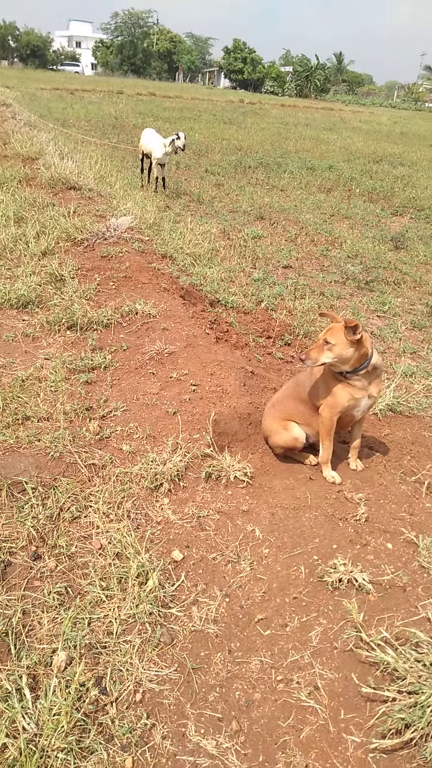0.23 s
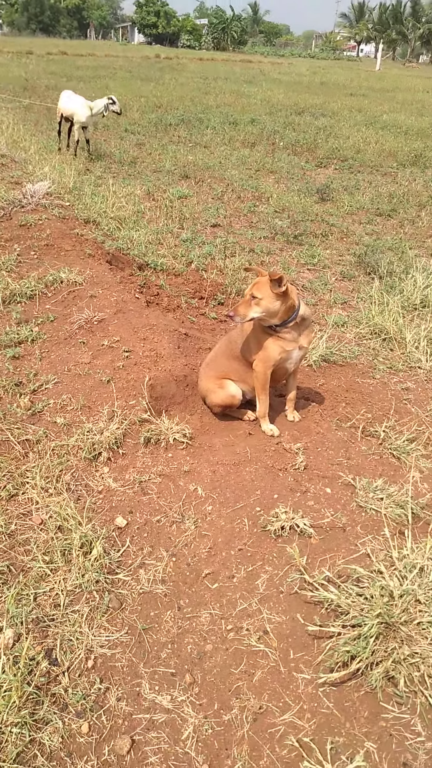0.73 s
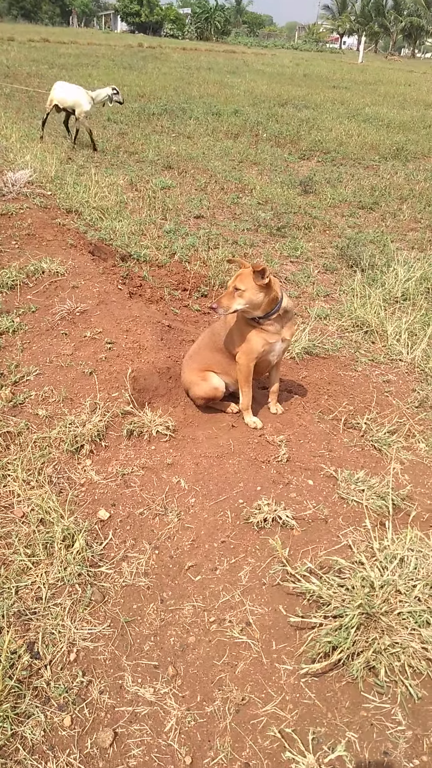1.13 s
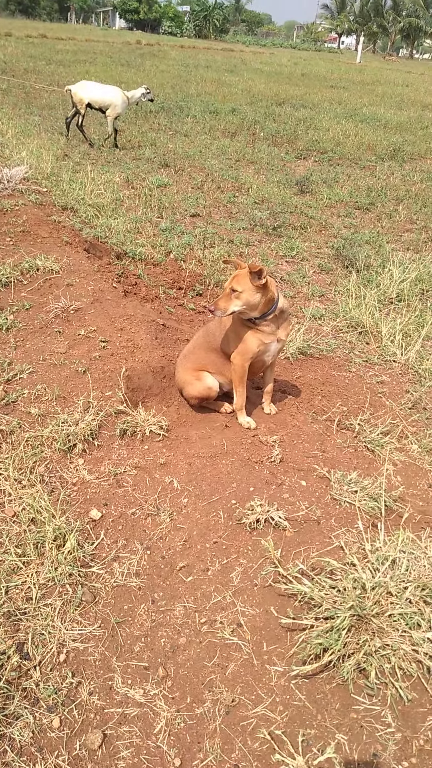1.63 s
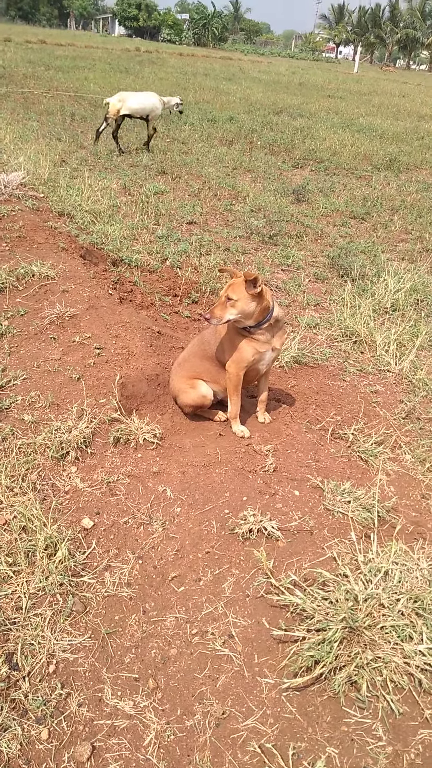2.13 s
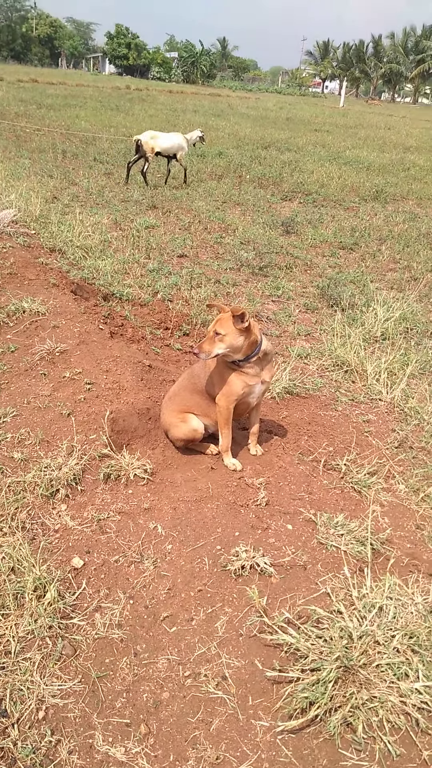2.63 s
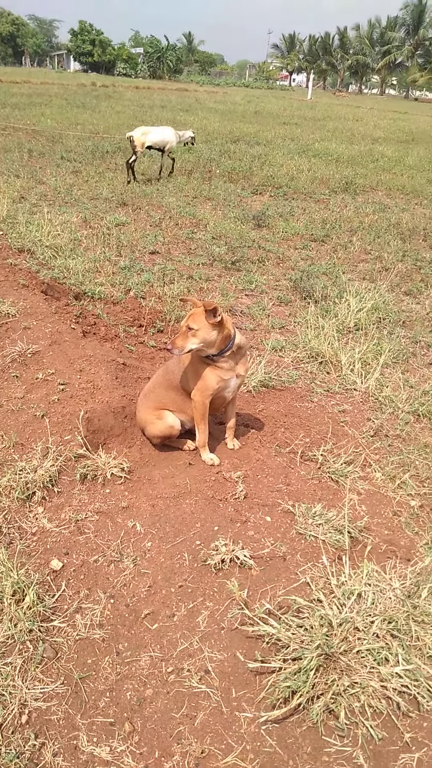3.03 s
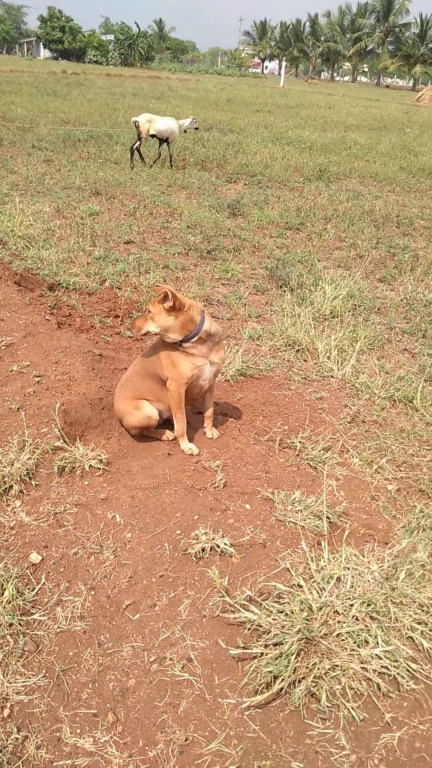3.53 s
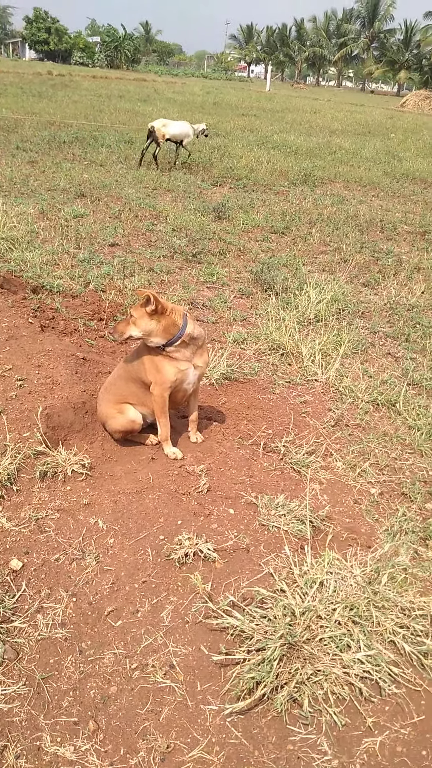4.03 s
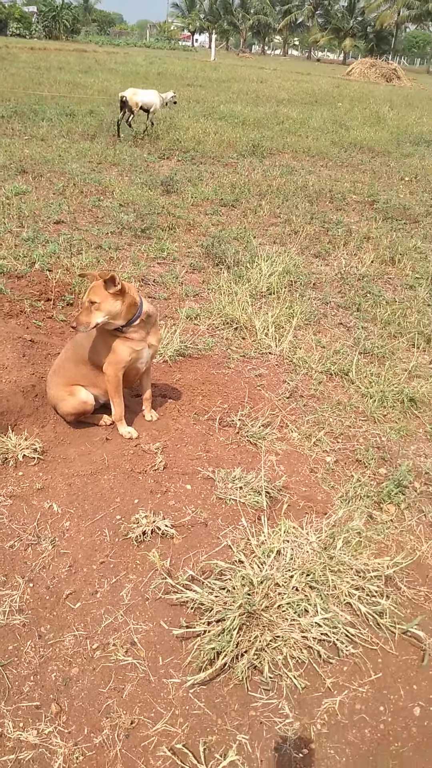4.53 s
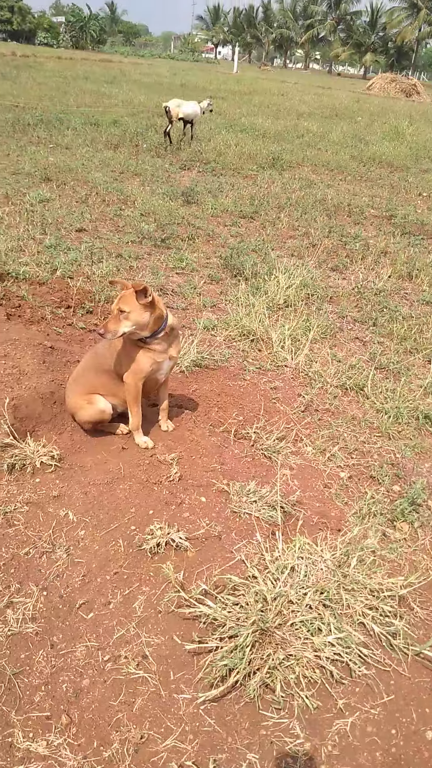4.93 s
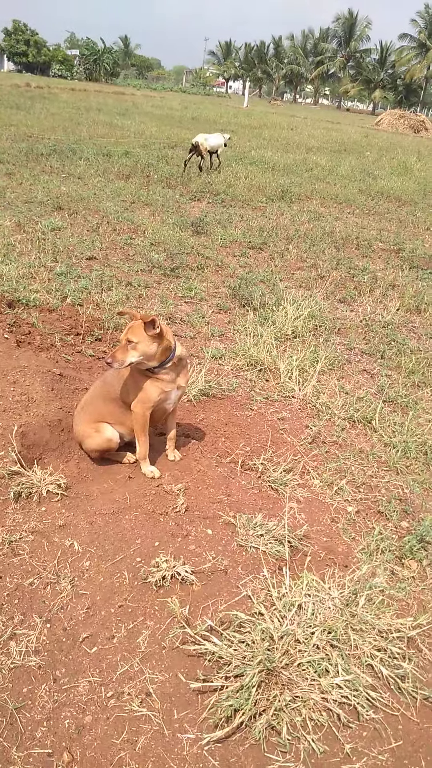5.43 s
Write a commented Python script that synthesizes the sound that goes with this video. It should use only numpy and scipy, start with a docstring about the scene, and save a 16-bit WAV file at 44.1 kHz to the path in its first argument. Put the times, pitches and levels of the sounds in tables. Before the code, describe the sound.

A cicada buzzes in a high, thin, continuous drone across an open field and grows somewhat louder in the second half. A small bird repeats short chirps, pauses, then starts again, while other birds add faint whistles and falling notes. Underneath, a distant road rumbles and hisses steadily, leaves rustle softly, and light wind bumps the microphone now and then.

```python
"""A cicada drones near 7 kHz in a hot, open field, with a narrow buzz near 6 kHz and a far chorus.
Its two drums take turns, their buckling ribs clicking and ringing at the body pitch.
A distant road rumbles, hums and hisses, leaves rustle and light wind bumps the front microphone port.
Small birds chirp, whistle and slur in near-sine notes, and dry grass crinkles briefly nearby.
The two ports are widened to stereo by subtracting a delayed copy of each from the other."""
import sys
import numpy as np
from scipy import signal
from scipy.fft import rfft, irfft
from scipy.io import wavfile
from scipy.ndimage import uniform_filter1d, map_coordinates

SR = 44100
rng = np.random.default_rng(int(sys.argv[2]) if len(sys.argv) > 2 else 0)


def pcm_store(signal):
    """Save signal as 16-bit PCM."""
    levels = np.round(np.clip(np.atleast_2d(signal), -1, 1) * 32767)
    wavfile.write(sys.argv[1], SR, levels.astype(np.int16).T)


N = 251370
TIME = np.arange(N) / SR
HZ = np.maximum(np.arange(N // 2 + 1) * SR / N, 1)


def from_db(db):
    return 10 ** (np.asarray(db) / 20)


def rms_one(x):
    return x / np.sqrt(np.mean(x ** 2) + 1e-20)


def in_time(rows):
    """One automation curve for each column after time_s."""
    time_s, *columns = np.transpose(rows)
    return [np.interp(TIME, time_s, column) for column in columns]


def eq_db(points):
    """An EQ curve over log frequency, ends held."""
    hz, db = np.transpose(points)
    return np.interp(np.log(HZ), np.log(hz), db)


def drift(rate_hz):
    """Smooth random modulation with a spread of about 1."""
    pole = np.exp(-2 * np.pi * rate_hz * 40 / SR)  # one control point per 40 samples
    slow = signal.lfilter([1], [1, -2 * pole, pole * pole], rng.standard_normal(N // 40 + 2002))[2000:]
    return np.interp(np.arange(N) / 40, np.arange(len(slow)), rms_one(slow))


def narrow_band(noise, hz, width_hz):
    """Noise twice through a resonant peak: a wavering tone at unit RMS."""
    r = np.exp(-np.pi * width_hz / SR)
    peak = np.array([1, 0, -1]) * (1 - r * r) / 2, [1, -2 * r * np.cos(2 * np.pi * hz / SR), r * r]
    return rms_one(signal.lfilter(*peak, signal.lfilter(*peak, noise)))


def filtered_noise(edges_hz, kind):
    sos = signal.butter(2, edges_hz, kind, fs=SR, output="sos")
    return rms_one(signal.sosfilt(sos, rng.standard_normal(N)))


def noise_bed(spectrum, flicker_db, bands):
    """Unit-RMS noise at both ports from a shared and a differing part; each band flickers on its own."""
    hz, *levels = np.transpose(spectrum)
    shape = from_db([np.interp(np.log(HZ), np.log(hz), db, left=-120, right=-120) for db in levels])
    noise = rfft(rng.standard_normal((2, N))) * shape
    centres = np.log(np.geomspace(hz[0], hz[-1], bands))
    weights = [np.interp(np.log(HZ), centres, row) for row in np.eye(bands)]
    shared, differing = sum(irfft(noise * w, N) * from_db(flicker_db * drift(15.7)) for w in weights)
    return rms_one(np.array([shared + differing, shared - differing]))


# The cicada's phrasing: start_s, first_pitch_hz, last_pitch_hz, second_drum_up_hz, stroke_fall_hz,
# second_stroke_weakness (0-1), stroke_depth (0-1), click_drag_rad, ring_between_clicks (0-1),
# chorus_db, low_skirt_db, high_skirt_db, top_over_high_skirt_db
CICADA_PHRASES = [(0, 6900, 6950, 280, 300, 0, 0.3, 0.7, 0.13, -57, 6.5, 11, -1.5),
                  (.35, 7020, 6860, 163, 150, 0.08, 0.6, 0.95, 0.14, -56, 7, 11.5, -3),
                  (1.52, 6905, 6795, 32, 180, 0.63, 0.2, .12, 0.08, -68, 3, 14, 5),
                  (2.46, 7200, 7100, 19.3, 200, 0.78, 0.2, .2, 0.12, -62, 3, 13.5, 6),
                  (2.68, 7020, 6970, 140, 386, 0.02, 0.6, 1.33, 0.22, -53, 2, 11.5, -1.5),
                  (4.5, 6926, 6940, 330, 400, 0, 0.4, .5, 0.14, -45.5, -0.5, 6, -3)]


def cicada_phrases():
    """Each phrase glides in pitch and crossfades into the next; its articulation blends more quickly."""
    def blend(x, seconds):
        return uniform_filter1d(x, size=round(seconds * SR), mode="nearest")

    start_s, first_hz, last_hz, *articulation = np.transpose(CICADA_PHRASES)
    current = np.clip(np.searchsorted(start_s, TIME) - 1, 0, None)
    progress = (TIME - start_s[:, None]) / np.diff(start_s, append=N / SR)[:, None]
    pitch_hz = first_hz[:, None] + (last_hz - first_hz)[:, None] * progress
    crossfade = blend(1. * (current == np.arange(len(start_s))[:, None]), seconds=.31)
    return pitch_hz, crossfade, [blend(column[current], seconds=.076) for column in articulation]


# Tone colour of the cicada's buzz, a peak near 7 kHz with uneven treble: frequency_hz, gain_db
CICADA_EQ = [(5300, -27), (5800, -9.5), (6100, -7.5), (6380, 0.5), (6620, -3), (6900, 0.5), (7200, -3),
             (7550, -8.5), (8000, -24), (8300, -12.5), (8620, -27.5), (9100, -23.5), (9600, -37),
             (11000, -39.5), (13000, -55)]


def cicada_colour(x, low_db, high_db, top_db):
    """The buzz's tone colour; the skirts around its main peak and the far treble swell on their own."""
    shaped = rfft(x) * from_db(eq_db(CICADA_EQ))
    low, high, top = np.clip([(6750 - HZ) / 250, (HZ - 7450) / 300, (HZ - 8500) / 900], 0, 1)
    bands = [(1 - low - high, 0), (low, low_db), (high - top, high_db), (top, high_db + top_db)]
    return sum(from_db(db) * irfft(shaped * band, N) for band, db in bands)


# The cicada's effort: time_s, muscle_strokes_per_s, level_db
CICADA_EFFORT = [(0, 113, -53), (.5, 102, -51.5), (.95, 100, -49), (1.45, 110, -46.5), (1.65, 117, -47),
                 (2.1, 117, -47.5), (2.4, 112.5, -50), (2.58, 114, -48), (2.78, 109, -45),
                 (3.0, 113.5, -45.5), (3.3, 110, -43), (3.7, 111.5, -43), (3.95, 112.5, -42.5),
                 (4.22, 111, -43.5), (5.3, 111, -44), (5.7, 110, -45.5)]
# Its bearing as the microphones turn: time_s, front_gain_db, front_lag_ms
CICADA_BEARING = [(0, 4.5, 0.45), (.5, 2, .44), (1.46, -1, 0.43), (1.6, -1, 0.43), (2.6, -1.5, 0.41),
                  (2.75, -2.5, 0.4), (4.3, -5.5, 0.416), (4.8, -14, 0.4), (5.1, -6.5, .42),
                  (5.7, -6.5, 0.42)]


def cicada(click_ms=.06, click_spread_db=.8, stroke_floor=.57, wobble_hz=13, surround_db=-54.5):
    """Rib clicks ring at the body pitch; two muscles take turns and swell them, over a far chorus."""
    strokes_per_s, level_db = in_time(CICADA_EFFORT)
    pitch_hz, crossfade, articulation = cicada_phrases()
    second_up_hz, fall_hz, weakness, depth, drag_rad, ring, chorus_db, *skirts_db = articulation
    turn = np.pi * np.cumsum(strokes_per_s) / SR + .05 * drift(20)  # pi radians per stroke

    clicks_per_s = 445.5 + .8 * (strokes_per_s - 111)
    drag = drag_rad * np.sin(2 * turn + .1)  # ribs buckle slower at the height of a stroke
    uneven = .3 * np.sin(turn + 1.1)  # one drum clicks later than the other
    count = 2 + np.cumsum(clicks_per_s) / SR + (drag + uneven) / (2 * np.pi)
    since_ms = 1000 * (count % 1) / clicks_per_s
    sizes = from_db(click_spread_db * rng.standard_normal(N // 50))[count.astype(int)]
    clicks = sizes * since_ms / click_ms * np.exp(1 - since_ms / click_ms)
    swell = (1 + stroke_floor - depth * np.cos(2 * turn)) * (1 + weakness * np.sin(turn))

    sag_hz = fall_hz * (turn / np.pi % 1 - .5)
    drum_hz = pitch_hz - sag_hz + second_up_hz * (np.sin(turn) < 0) + wobble_hz * drift(38)
    cycles = np.cumsum(drum_hz, axis=1) / SR
    new_stroke = np.diff(turn // np.pi, prepend=0) > 0
    cycles -= np.maximum.accumulate(cycles * new_stroke, axis=1)  # each stroke rings afresh
    tone = np.sum(crossfade * np.sin(2 * np.pi * cycles), axis=0)
    song = cicada_colour((clicks + ring) * swell * tone, *skirts_db)
    song *= from_db(level_db) / np.sqrt(uniform_filter1d(song ** 2, size=8000))

    chorus = rms_one(cicada_colour(rng.standard_normal((3, N)), *skirts_db))
    song += from_db(chorus_db) * chorus[2]  # more cicadas in the same trees
    front_db, lag_ms = in_time(CICADA_BEARING)
    front = from_db(front_db) * map_coordinates(song, [(TIME - lag_ms / 1000) * SR], mode="nearest")
    return np.array([front, song]) + from_db(surround_db) * chorus[:2]  # and others all around


# Fader for the cicada's lower side band: time_s, level_db
LOW_BUZZ_LEVEL = [(0, -68), (1.5, -61), (1.7, -66), (2.9, -63), (3.3, -56.5), (4.5, -61.5), (5.7, -65)]


def low_buzz():
    """The cicada's lower side band: a narrow, buzzy hiss near 6 kHz, loudest at the rear port."""
    level_db, = in_time(LOW_BUZZ_LEVEL)
    hiss = narrow_band(rng.standard_normal(N), hz=5995, width_hz=170)
    return from_db(level_db) * hiss * from_db([[-4], [0]])


# Slow swell of the low end: time_s, gain_db
RUMBLE_SWELL_DB = [(0, 1.5), (.7, -1), (1.6, 0.55), (2.6, 1), (3.2, -0.5), (3.8, -0.2), (4.8, 0),
                   (5.2, 1.2), (5.7, 0)]
# Colour of the rumble: frequency_hz, shared_db, differing_db
RUMBLE_SPECTRUM = [(20.8, -14, -43), (35.8, -13, -29), (55.6, 1.5, -27), (78, -2, -29), (222.4, -8.5, -28),
                   (291, -17.5, -33), (465, -27.5, -31.5), (677, -42.5, -60)]
# Engine tones: pitch_hz, width_hz, level_db
ENGINE_TONES = [(75.03, 3.1, -40), (102.66, 2.1, -42.5), (144.4, 6.6, -47), (198.4, 5.5, -42.5)]


def far_engines():
    """A low rumble and wavering engine hums, swaying in level together."""
    sway_db = in_time(RUMBLE_SWELL_DB)[0] - .75 * drift(5.7)
    rumble = from_db(-33.5) * noise_bed(RUMBLE_SPECTRUM, flicker_db=.2, bands=5)
    white = rng.standard_normal(N)
    hums = sum(from_db(db) * narrow_band(white, hz, width_hz) for hz, width_hz, db in ENGINE_TONES)
    return from_db(sway_db) * (rumble + hums * from_db([[.6], [-.6]]))


# Faders for the background: time_s, road_db, leaves_db
BED_LEVELS = [(0, -50.5, -62.5), (.7, -54, -61), (1.4, -53, -61.5), (2.4, -54, -53), (3.0, -52, -55),
              (3.8, -54.5, -61), (4.4, -59.5, -58), (5.0, -55.5, -54), (5.7, -54, -54.5)]
# Colour of the road hiss: frequency_hz, shared_db, differing_db
ROAD_SPECTRUM = [(350, -8.5, -19), (560, 0.5, 0), (854, 1, -5.5), (1260, -10.5, -1), (1766, -6.5, -2.5),
                 (2270, -56, -63)]
# Colour of the leaf rustle: frequency_hz, shared_db, differing_db
LEAF_SPECTRUM = [(1638, 4, -9), (2400, 4, 8.5), (3000, -0.5, -7), (4000, -0.5, -0.5), (4560, -4, -5),
                 (5300, -8.5, 5), (8920, -2, -18)]


def road_and_leaves():
    """The road's midrange hiss and the brighter rustle of leaves, each on its own fader."""
    road_db, leaves_db = in_time(BED_LEVELS)
    road = from_db(road_db) * noise_bed(ROAD_SPECTRUM, flicker_db=1.27, bands=4)
    leaves = from_db(leaves_db) * noise_bed(LEAF_SPECTRUM, flicker_db=2.15, bands=6)
    return road + leaves


# Colour of the high air: frequency_hz, shared_db, differing_db
AIR_SPECTRUM = [(4000, -34, -12), (7400, 13.5, -21), (10060, -12, -4), (12300, -9.5, -11),
                (14400, -13, -12)]


def air():
    """A faint, flickering sheen of treble hiss."""
    return from_db(-61) * noise_bed(AIR_SPECTRUM, flicker_db=2.1, bands=3)


# Pass-bys on the far road: nearest_s, level_db, half_power_after_s
PASS_BYS = [(.05, -53.5, 0.28), (2.85, -50.5, 0.17), (3.1, -52.5, 0.2), (3.8, -62.5, 1.5),
            (5.05, -53, 0.37)]
# Colour of the tyre whine: frequency_hz, shared_db, differing_db
TYRE_SPECTRUM = [(705, -9.5, -45), (1050, 0.5, 1.5), (1206, 1, 0.5), (1290, 2.5, -1.5), (1376, 0.5, -2.5),
                 (1520, -2, -15), (2060, -26, -8), (3000, -15, -22)]


def tyres(steady_db=-62):
    """Tyre whine falls with distance either side of each pass, over the steady traffic."""
    power = sum(from_db(db) ** 2 / (1 + ((TIME - s) / fade_s) ** 2) for s, db, fade_s in PASS_BYS)
    level = np.sqrt(power + from_db(steady_db) ** 2)
    return level * noise_bed(TYRE_SPECTRUM, flicker_db=2, bands=4)


# Bumps of wind: peak_s, level_db
WIND_BUMPS = [(.2, -37.5), (.45, -36), (1.015, -39), (1.61, -32), (2.059, -35), (3.54, -48), (4.56, -36),
              (4.78, -46), (5.28, -36)]


def wind_bumps():
    """Soft low thumps of air on the front port only."""
    envelope = sum(from_db(db) * np.exp(-((TIME - s) / .0062) ** 2) for s, db in WIND_BUMPS)
    return filtered_noise([30, 130], "band") * envelope * [[1], [0]]


def bird_note(start_s, length_s, path_hz, db, wobble_hz, lateness=1):
    """An unsteady sine under a soft arch; path_hz maps 0-1 to pitch, lateness over 1 delays the peak."""
    progress = np.linspace(0, 1, round(length_s * SR))
    span = round(start_s * SR) + np.arange(len(progress))
    cycles = np.cumsum(path_hz(progress) + wobble_hz[span]) / SR
    note = np.zeros(N)
    note[span] = from_db(db) * np.sin(np.pi * progress ** lateness) * np.sin(2 * np.pi * cycles)
    return note


def glide(start_hz, end_hz, bend=1):
    return lambda progress: start_hz + (end_hz - start_hz) * progress ** bend


# The steady chirper's calls: start_s, note_db, second_note_db, falling_flick_db, rising_flick_db
CHIRP_CUES = [(.277, -53, -57, -54, -52), (.632, -47, -57, -50, -54), (.994, -45, -57, -57, -56),
              (1.36, -43.5, -60, -59, -58), (3.397, -49, -71, -57, -71), (3.745, -51, -62, -55, -60),
              (4.084, -52, -60, -58, -52), (4.436, -60, -64, -66, -66), (4.794, -51, -56, -62, -66),
              (5.166, -48, -65, -61.5, -50), (5.517, -47, -60, -65, -60)]
# Thin flicks around each call: offset_s, length_s, start_hz, end_hz, lateness (exponent)
CHIRP_FLICKS = [(-.015, 0.02, 4660, 4270, 1), (0.042, 0.015, 4120, 5680, 1.5)]


def chirper(wobble_hz, note_s=.039, second_after_s=.06, front_db=-25, front_lag_ms=.1):
    """A note that rises and is loudest as it droops, a fainter one after it, and two quick flicks."""
    def droop_hz(progress):
        return 3870 + 100 * progress - 300 * progress ** 4

    calls = np.zeros(N)
    for start_s, db, second_db, *flicks_db in CHIRP_CUES:
        calls += bird_note(start_s, note_s, droop_hz, db, wobble_hz, lateness=2.6)
        calls += bird_note(start_s + second_after_s, note_s, droop_hz, second_db, wobble_hz, 1.2)
        for (offset_s, length_s, *ends_hz, lateness), flick_db in zip(CHIRP_FLICKS, flicks_db):
            calls += bird_note(start_s + offset_s, length_s, glide(*ends_hz), flick_db, wobble_hz, lateness)
    front = from_db(front_db) * map_coordinates(calls, [(TIME - front_lag_ms / 1000) * SR])
    return np.array([front, calls])


# Straight whistles: start_s, length_s, start_hz, end_hz, level_db, front_gain_db
WHISTLE_CUES = [(0.463, .03, 3700, 3450, -63.5, 5), (0.543, 0.024, 3060, 3000, -56, -11),
                (0.911, 0.031, 3110, 3050, -54, -8), (1.275, 0.02, 3030, 3000, -51.5, -15),
                (2.303, 0.05, 5570, 5200, -59, -5), (2.72, 0.1, 3760, 3380, -76, -8),
                (3.04, 0.038, 4000, 3580, -66, 0), (3.156, .012, 5650, 5600, -54, 1),
                (3.188, .014, 5670, 5300, -50.5, 1), (3.2, 0.022, 5280, 5460, -52, 1),
                (3.223, 0.00995, 5300, 5130, -61, 1), (3.28, .1, 4120, 3800, -66, -8),
                (3.68, .07, 3690, 3820, -62, -6), (4.258, 0.13, 3290, 4050, -62, 6),
                (4.418, 0.026, 3450, 3410, -56, -1), (4.969, 0.033, 4810, 4320, -50, 4),
                (5.22, 0.025, 3170, 3157, -60, -3), (5.475, 0.063, 4210, 5000, -63, 6),
                (5.525, .055, 4900, 5500, -62, 3), (5.548, .035, 5200, 4900, -68, 10)]
# One bird's downward slurs: start_s, length_s, level_db, front_gain_db
SLUR_CUES = [(1.607, 0.1, -66, 6), (1.812, .085, -66, 13), (2.065, .09, -66, 9)]


def other_birds(wobble_hz, front_lag_samples=9):
    """Whistles glide straight; slurs hold their pitch, then drop."""
    notes = [(s, length_s, glide(hz, end_hz), *dbs) for s, length_s, hz, end_hz, *dbs in WHISTLE_CUES]
    notes += [(s, length_s, glide(4050, 3351.4, bend=2.21), *dbs) for s, length_s, *dbs in SLUR_CUES]
    ports = np.zeros((2, N))
    for start_s, length_s, path_hz, db, front_db in notes:
        note = bird_note(start_s, length_s, path_hz, db, wobble_hz)
        ports += [from_db(front_db) * np.roll(note, front_lag_samples), note]
    return ports


def birds(flutter_db=2.5, tail_db=-7, tail_t60_s=.09):
    """The bird bus: moving air ruffles the notes, and grass and trees smear a short tail."""
    wobble_hz = 45 * drift(120)
    calls = (chirper(wobble_hz) + other_birds(wobble_hz)) * from_db(flutter_db * drift(89))
    tail = rng.standard_normal((2, 4000)) * from_db(-60 * TIME[:4000] / tail_t60_s)
    tail *= from_db(tail_db) / np.linalg.norm(tail, axis=1, keepdims=True)
    return calls + signal.fftconvolve(calls, tail, axes=1)[:, :N]


# A dry rustle nearby: peak_s, level_db
CRINKLES = [(4.150, -68), (4.164, -63)]


def dry_grass():
    """Soft, bright crinkles: tiny spikes of treble noise."""
    envelope = sum(from_db(db) * np.exp(-np.abs(TIME - s) / .0027) for s, db in CRINKLES)
    return filtered_noise(5000, "high") * envelope


def scene():
    """The field at the two microphone ports: front, rear."""
    bed = far_engines() + road_and_leaves() + tyres() + air()
    return bed + cicada() + birds() + wind_bumps() + low_buzz() + dry_grass()


# The delayed copy, rolling off in the treble: frequency_hz, gain_db
CROSSFEED_EQ = [(5200, 0), (6000, -7)]
# Tone of the left channel against the right: frequency_hz, left_over_right_db
BALANCE_EQ = [(60, -1), (120, 1), (230, 2.5), (460, 2.5), (900, 0), (1770, -3.5), (3490, 2), (6880, -1.5),
              (13500, -5)]


def record(dry, delay_ms=.4741, cutoff_hz=14150):
    """Each channel is its port minus the other port delayed: sum and difference get interleaved notches."""
    ports = rfft(dry)
    crossfeed = from_db(eq_db(CROSSFEED_EQ)) * np.exp(-2j * np.pi * HZ * delay_ms / 1000)
    balance = from_db(eq_db(BALANCE_EQ) * [[.5], [-.5]])
    wide = irfft((ports - crossfeed * ports[::-1]) * balance, N)
    return signal.sosfilt(signal.ellip(12, .3, 80, cutoff_hz, fs=SR, output="sos"), wide)


dry = scene()
out = record(dry)
pcm_store(out)
```